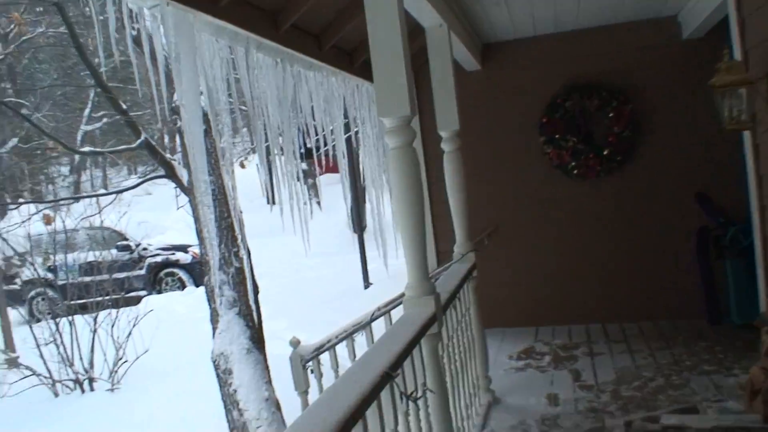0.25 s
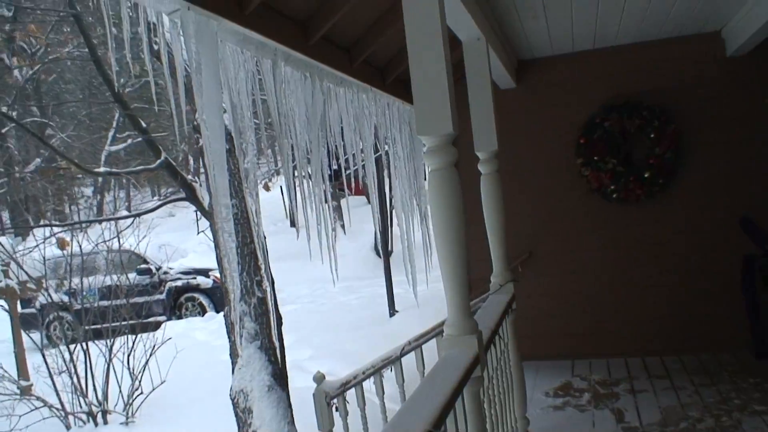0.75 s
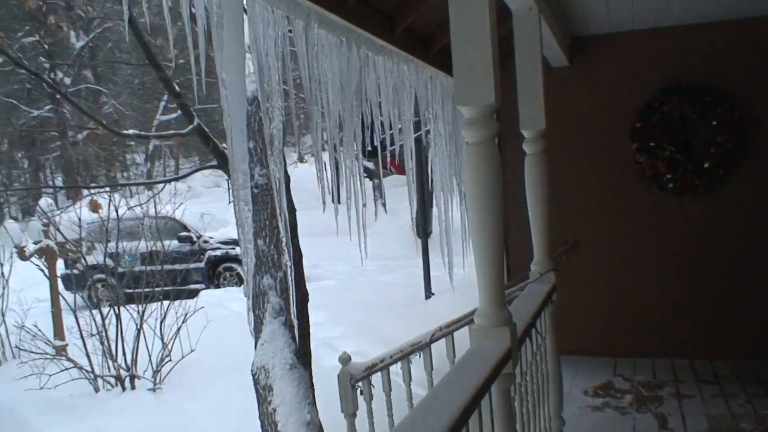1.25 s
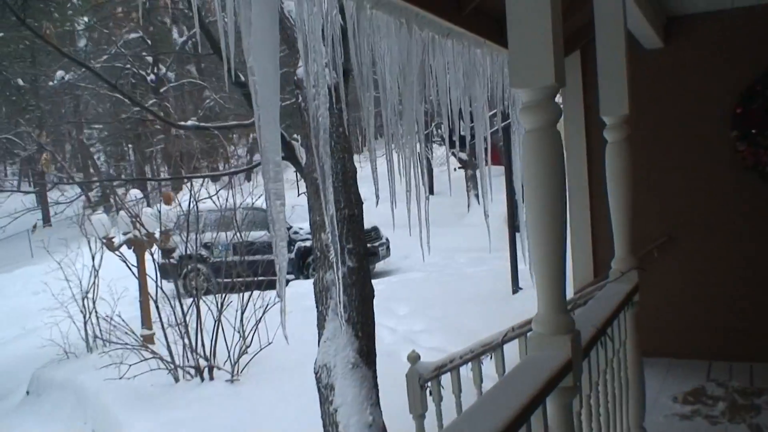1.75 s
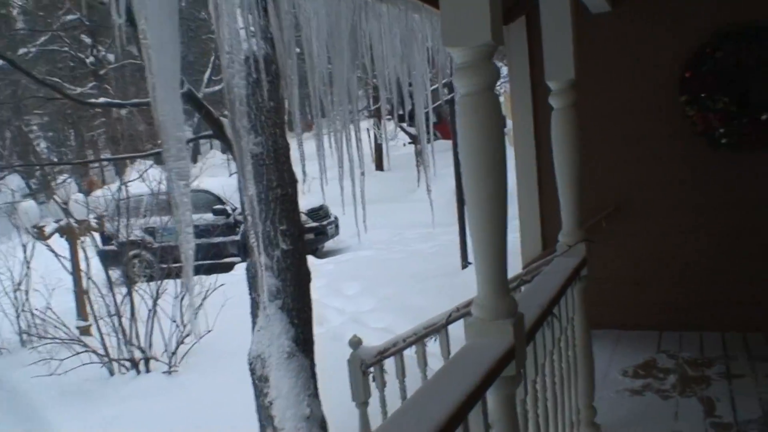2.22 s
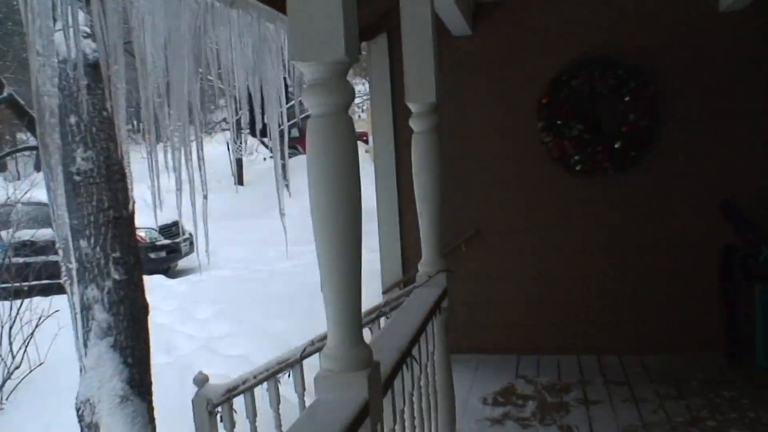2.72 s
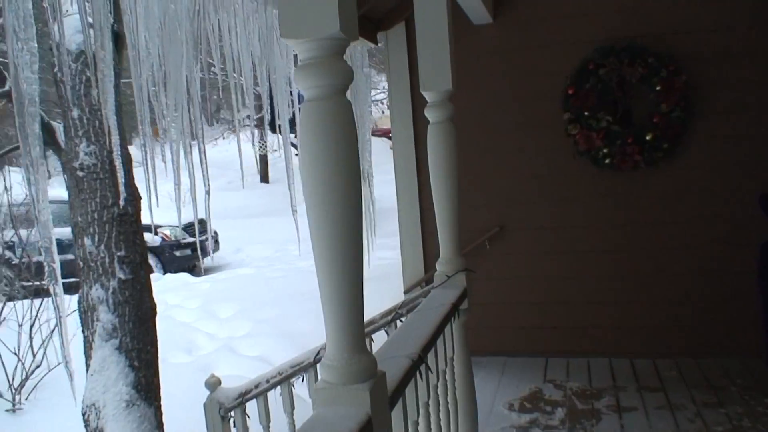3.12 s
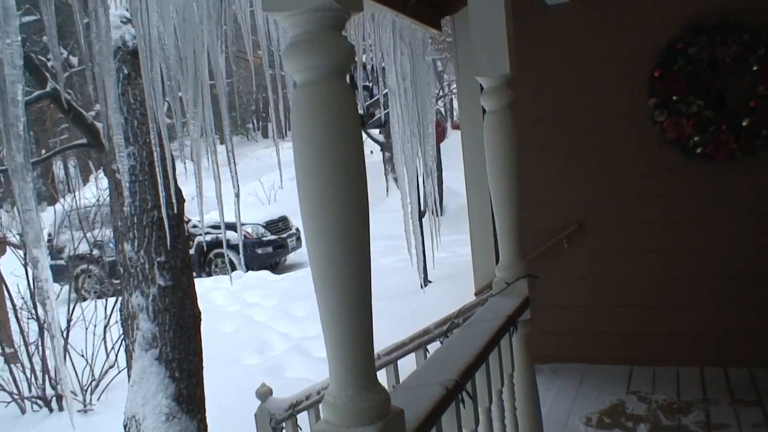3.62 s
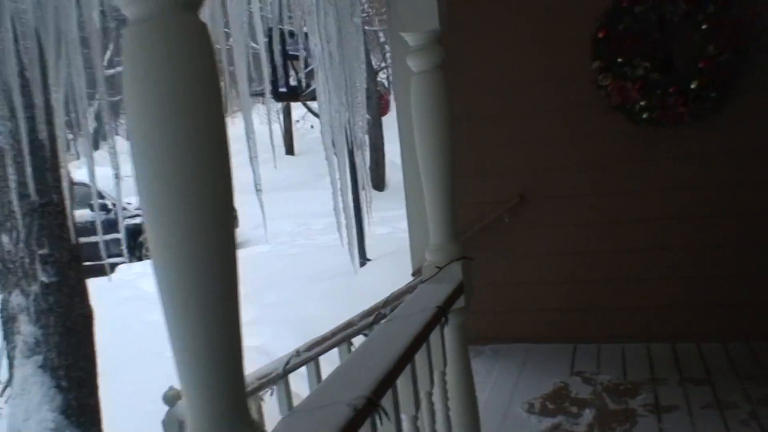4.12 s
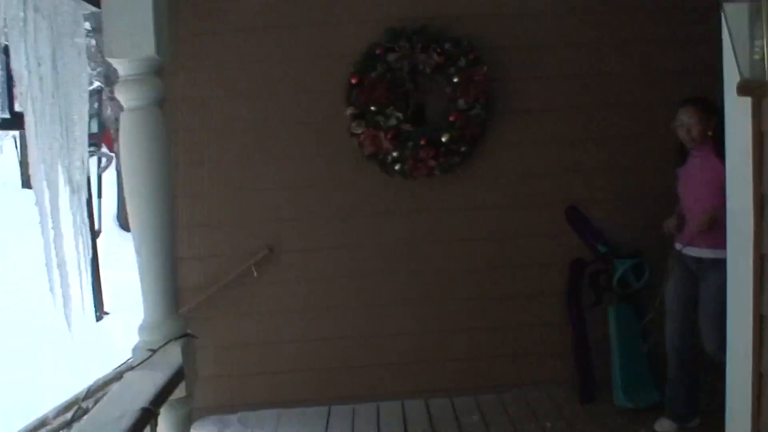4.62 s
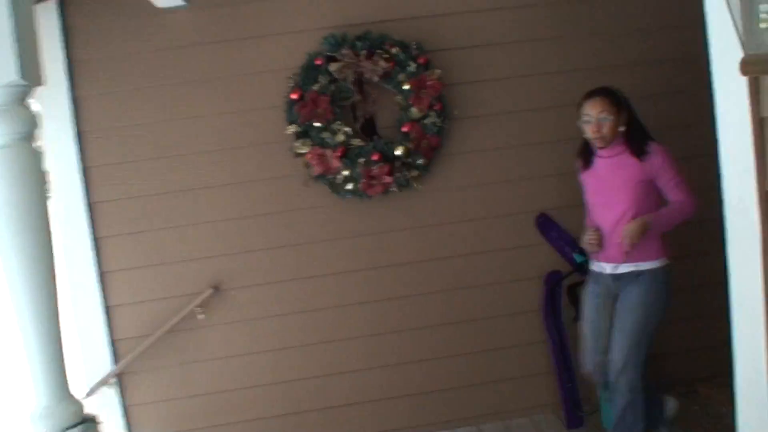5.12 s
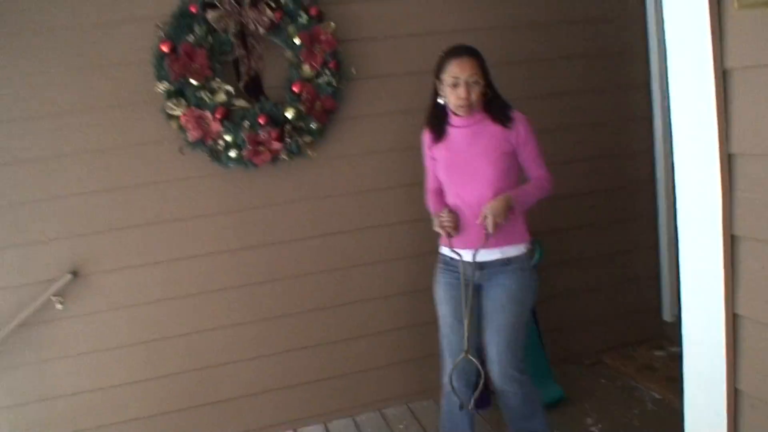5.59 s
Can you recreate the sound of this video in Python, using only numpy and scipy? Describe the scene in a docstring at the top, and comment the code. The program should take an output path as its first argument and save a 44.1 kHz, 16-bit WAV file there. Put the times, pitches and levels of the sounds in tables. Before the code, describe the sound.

Close, woody footfalls on an outdoor porch: heel and sole contacts rattle together, joists thump underneath and snow crackles lightly. The steps continue to the end, the heaviest blow coming late, followed by lighter knocks. Behind them are a weak low hum, a muffled winter outdoor wash and thin hiss. The hand-held camera adds deep, soft bumps, and the covered space answers briefly.

```python
"""Boots on a snowy porch

Boots walk along the boards of a snowy, roofed porch, heard by a hand-held camera. Each contact rings joists
and planks as fading sine waves and adds noise bursts for the knock and the cracking snow; scuffs are grainy noise.
A low engine-like hum, built from sine waves, climbs and drops far off. Shaped noise makes the hand bumps,
the far outdoor wash and the camera's own hiss."""
import sys
import numpy as np
from scipy import signal
from scipy.fft import rfft, irfft, next_fast_len
from scipy.io import wavfile
from scipy.ndimage import uniform_filter1d, map_coordinates

SR = 44100
rng = np.random.default_rng(int(sys.argv[2]) if len(sys.argv) > 2 else 0)


def to_wav(sig):
    """Store sig (one row per channel, or 1-D mono) as 16-bit WAV at the path in sys.argv[1].

    Samples outside -1..1 are clipped; the rate is SR.
    """
    pcm = np.clip(np.atleast_2d(sig), -1, 1) * 32767
    pcm = np.round(pcm).astype(np.int16)
    wavfile.write(sys.argv[1], SR, pcm.T)  # frames by channels


N = 258013

# Noise colors. Each row: frequency in Hz, relative level in dB per Hz.
# Far outdoor wash.
WASH_COLOR = [(35, -40), (60, -0.5), (90, -7), (200, -10.5), (350, -29.5), (650, -17.5), (1200, -23),
              (3000, -29), (6000, -46.5), (9000, -80.5)]
# The camera's own hiss.
HISS_COLOR = [(1500, -26), (4000, -6), (8000, -5.5), (11000, -5), (11500, -2), (16600, -2)]
# Hand thumps on the camera.
THUMP_COLOR = [(12, -15), (26, 3.5), (40, 0), (60, 0.5), (82, -1), (120, -44)]
# Rumbling joists, the beams under the boards.
JOIST_COLOR = [(40, -55), (90, -4.5), (135, -1.5), (200, -5.5), (330, -1), (450, -9), (1200, -76)]
# Knocked or scuffed board surface.
BOARD_COLOR = [(150, -70), (380, 2), (500, 0.5), (900, -1.5), (1500, -7.5), (3500, -27.5)]
# Gritty snow under a sliding sole.
GRIT_COLOR = [(500, -48), (1400, -4), (2500, 5), (4000, -5), (8000, -22), (11000, -38.5), (16500, -25)]
# Cracking snow crust.
CRACK_COLOR = [(600, -12), (1500, 5.5), (2600, 1.5), (3800, -4), (6000, -40)]
# The fine fizz of crushed snow.
FIZZ_COLOR = [(2500, -16), (4200, 2.5), (8000, 2.5), (11000, -7.5), (16500, -8)]

# How alike left and right are for near sounds. Each row: frequency in Hz, likeness (1 is identical).
NEAR_LIKENESS = [(30, 0.29), (130, 1), (400, 0.62), (2400, 0.97), (8000, 0.73), (11000, 0.19), (11500, 1)]
# The same for background and porch echo. Each row: frequency in Hz, likeness (1 is identical).
FAR_LIKENESS = [(30, 0.91), (130, 1), (640, 0.67), (1400, 0.61), (3100, 0.82), (11000, 0.97), (11500, 1)]
# Balance of the microphone pair. Each row: frequency in Hz, left minus right in dB.
LEFT_OVER_RIGHT = [(30, 3.2), (130, 4.4), (220, 3), (330, .2), (700, -.5), (4000, .6), (12000, 0)]
# How long the porch echoes. Each row: frequency in Hz, time to fall by 60 dB in seconds.
PORCH_T60 = [(100, 0.39), (1000, 0.36), (8000, 0.34)]

# Jolts of the hand. Each row: peak time in seconds, peak gain in dB, fall in dB per second.
HAND_JOLTS = [(0.11, -38, 203), (0.49, -40.5, 152), (0.62, -40.5, 155), (0.75, -46, 185), (1.01, -50, 19),
              (1.38, -49, 43), (1.82, -50, 48), (2.22, -37.5, 62), (2.59, -42, 303), (3.13, -48, 300),
              (3.4, -59, 125), (3.55, -48, 128), (3.98, -50, 12), (4.2, -44, 38), (4.675, -34.5, 76),
              (5.18, -43, 180), (5.35, -45.5, 42), (5.62, -49, 80)]
# The hum's moving note. Each row: time in seconds, pitch in Hz, level in dB.
HUM_NOTE = [(0.0, 60, -36), (0.35, 53.14, -54), (0.62, 51.2, -40.5), (0.72, 52.1, -49.5),
            (1.25, 53.3, -53.5), (1.43, 55, -40), (1.55, 54, -53), (1.7, 50.7, -45.5), (1.85, 62.7, -46),
            (2.04, 71.3, -50), (2.16, 70, -56)]
# The hum's lower drone. Each row: time in seconds, pitch in Hz, level in dB, level an octave up in dB.
HUM_DRONE = [(2.0, 35.54, -51, -55), (2.41, 40.2, -60, -62), (2.55, 40.2, -57, -71), (3.13, 39.1, -57, -62),
             (3.3, 37.8, -57, -58.5), (4.15, 35.2, -57, -60)]

# Soles sliding and snow packing. Each row: time in seconds, level of the boards in dB.
SCUFF_LEVELS = [(0.0, -58.5), (0.23, -67.5), (1.5, -60.5), (1.87, -66.5), (2.17, -60.5), (2.34, -48),
                (2.46, -51.5), (2.62, -62), (2.93, -64.5), (3.45, -56), (3.65, -62), (3.93, -67.5),
                (4.1, -56), (4.64, -61), (4.81, -54), (5.13, -63.5), (5.46, -54.5), (5.85, -62.5)]
# Boot contacts. Each row: start in seconds, knock level in dB, joist thud level in dB, plank body level in dB,
# crack level in dB, fizz level in dB, base 60 dB fall time of the wood in seconds, knock pitch in Hz.
BOOT_CONTACTS = [(0.045, -46, -44.5, -46, -61, -63, 0.28, 530),
                 (0.074, -33, -43, -38, -44.5, -57, 0.31, 460),
                 (0.453, -32, -42, -39.5, -42, -47, 0.22, 401),
                 (0.474, -36, -56, -47, -39.5, -39.5, 0.22, 474),
                 (0.501, -39.5, -40.5, -48, -52, -49, 0.16, 474),
                 (0.526, -33, -46, -41.5, -50.5, -54, 0.23, 486),
                 (0.555, -52, -45, -52, -57, -62, 0.17, 471),
                 (0.593, -51, -53, -44.5, -52.5, -57, 0.22, 482),
                 (0.717, -28, -31.5, -39.5, -46.5, -65, 0.18, 423),
                 (1.113, -45, -50.5, -64, -58, -67, 0.27, 1100),
                 (1.3, -42.5, -59, -59, -47.5, -55, 0.2, 668),
                 (1.318, -35, -50, -48, -44.5, -51, 0.26, 509),
                 (1.343, -32, -46, -36.5, -43, -45, 0.29, 799),
                 (1.368, -27.5, -38.5, -33.5, -43, -51, 0.22, 415),
                 (1.395, -30.5, -32, -45, -49, -49, 0.16, 466),
                 (1.421, -29, -42.5, -34, -45, -49, 0.2, 460), (1.434, -28, -46, -42, -47, -44, 0.22, 912),
                 (1.452, -39, -50, -45, -57, -55, 0.22, 412), (1.48, -36, -47, -42.5, -66, -56, 0.19, 447),
                 (1.673, -48, -43.5, -47, -55, -68, 0.28, 417),
                 (1.792, -28.5, -31, -40.5, -50.5, -59, 0.12, 439),
                 (1.828, -63, -39.5, -68, -63, -72, 0.19, 517),
                 (2.12, -40.5, -62, -58, -50, -60, 0.36, 783),
                 (2.209, -30.5, -42.5, -43.5, -39, -47.5, 0.3, 487),
                 (2.256, -51, -46, -62, -53, -49, 0.14, 633),
                 (2.314, -32, -40, -42, -36.5, -46.5, 0.2, 401), (2.339, -44, -38, -47, -57, -50, 0.2, 797),
                 (2.355, -29.5, -40.5, -38.5, -57, -51, 0.24, 401),
                 (2.378, -31, -39, -40, -49, -42, 0.18, 690), (2.399, -43, -38, -42, -52, -58, 0.15, 420),
                 (2.463, -46, -59, -48.5, -42, -42, 0.22, 692),
                 (2.557, -34.5, -38.5, -44.5, -50, -47, 0.2, 735),
                 (2.589, -43.5, -43.5, -55, -48.5, -50.5, 0.23, 767),
                 (3.063, -49, -48, -54.5, -50.5, -53, 0.22, 428),
                 (3.091, -41.5, -42.5, -48, -67, -75, 0.35, 530),
                 (3.138, -30, -35, -33.5, -47, -75, 0.24, 640),
                 (3.262, -45, -50, -58, -51.5, -52.5, 0.47, 720),
                 (3.367, -41, -46.5, -52.5, -69, -58, 0.2, 654),
                 (3.45, -31.5, -39.5, -44, -46, -51, 0.15, 891),
                 (3.487, -34.5, -34, -33.5, -39.5, -54, 0.24, 644),
                 (3.597, -39.5, -51, -55, -48.5, -52, 0.26, 484),
                 (3.886, -39.5, -57, -62, -43.5, -46.5, 0.6, 1040),
                 (3.914, -28.5, -28.5, -35, -38.5, -47.5, 0.27, 500),
                 (3.994, -40, -42.5, -50, -52, -52, 0.16, 487),
                 (4.083, -39.5, -56, -50.5, -52, -51, 0.36, 425),
                 (4.147, -33, -60, -48, -60, -70, 0.22, 447),
                 (4.193, -43.5, -45.5, -53, -50.5, -66, 0.22, 657),
                 (4.304, -41, -41, -43.5, -48.5, -71, 0.3, 579),
                 (4.348, -43, -48, -46, -50.5, -44.5, 0.19, 468),
                 (4.406, -44, -59, -49, -51, -55, 0.2, 455), (4.601, -38.5, -52, -43, -47, -55, 0.4, 498),
                 (4.625, -27.5, -38, -38, -39.5, -70, 0.25, 550),
                 (4.686, -35.5, -39, -43, -42.5, -41.5, 0.14, 681),
                 (4.717, -23, -24.5, -32, -38.5, -44, 0.22, 476),
                 (4.752, -35, -30.5, -46, -49, -55, 0.16, 401), (4.789, -53, -38, -47, -67, -73, 0.17, 415),
                 (4.822, -30, -49, -51, -44.5, -67, 0.2, 471),
                 (4.846, -33, -44.5, -53, -53, -69, 0.26, 1290),
                 (4.918, -38, -49, -55, -60, -62, 0.14, 750),
                 (4.966, -30, -48.5, -46, -49.5, -65, 0.17, 770),
                 (5.071, -55, -50, -53, -53.5, -51.5, 0.29, 428),
                 (5.104, -43.5, -47, -50, -45.5, -50, 0.44, 673),
                 (5.132, -34, -45.5, -51.5, -46.5, -52, 0.27, 649),
                 (5.311, -39, -56, -51, -43, -44.5, 0.27, 825),
                 (5.386, -29.5, -35, -39.5, -41, -65, 0.18, 640),
                 (5.54, -42.5, -56, -55, -62, -62, 0.28, 401),
                 (5.582, -40.5, -45.5, -42, -44, -46, 0.39, 401)]

# Modes, the notes at which wood likes to ring.
# Each row: middle frequency in Hz, relative level in dB, fall time as a share of the contact's wood fall time.
# The heavy joists.
JOIST_NOTES = [(100.5, -12, 1.7), (118.9, -1.5, 0.63), (135.2, 0.5, 1.08), (161.6, -1.5, 0.81),
               (191.4, 1, 0.65), (211.7, 1, 0.55)]
# The planks, same columns: frequency in Hz, relative level in dB, share of the wood fall time.
PLANK_NOTES = [(235.5, 0, 0.65), (275.8, 1, 0.4), (328, 0, 0.55), (371, -10.5, 0.57)]
# The plank surface, same columns: frequency in Hz, relative level in dB, share of the wood fall time.
SURFACE_NOTES = [(429, 0, 0.34), (445.6, 3, 0.3), (499, -4, 0.56), (563, -0.5, 0.19), (633, -2, 0.43),
                 (756.4, -4, 0.83), (876, -0.5, 0.379), (1040, -11, 0.89), (1150, -8, 0.089),
                 (1405, -11, 0.43)]

TOP_HZ = 16550  # highest frequency kept, in Hz
GRIP_DB, JOLT_RISE = -67.5, 240  # steady handling gain in dB; swell of a jolt in dB per second
GRIT_DB, JOISTS_DB = -15.5, -4.5  # average level compared with the scuffed boards
GRIT_GROWS, JOISTS_GROW = 2.2, 1  # how far they swing, in dB per dB of the boards
RING_DB, RAP_DB = -10, -12.5  # the knock's tonal and noisy parts, compared with the knock level
SCATTER_DB = 0.6  # typical left-right scatter of the contacts
FOCUS_DB = 7  # surface modes lose this much per octave away from the knock's pitch
BURST_T60, RISE_S = 0.13, 0.0013  # base fall time (60 dB) and base rise time in seconds, scaled for each part


def amp(db):
    """Turns dB into a gain."""
    return 10 ** (np.asarray(db) / 20)


def unit(x):
    """Scales x to an average strength (rms) of 1."""
    return x / np.sqrt(np.mean(x ** 2) + 1e-20)


def along(points, hz):
    """Reads a (Hz, value) table between its points, on a log frequency axis."""
    f, v = np.transpose(points)
    return np.interp(np.log(hz + 1), np.log(f + 1), v)


def curves(rows):
    """Gives one value per sample for each column after the time."""
    s, *cols = np.transpose(rows)
    return [np.interp(np.arange(N) / SR, s, c) for c in cols]


def wobble(rate):
    """A smooth random curve through `rate` random points a second."""
    points = rng.standard_normal(int(N * rate / SR) + 4)
    return map_coordinates(points, [np.arange(N) * rate / SR])


def filtered(x, response):
    """Multiplies the spectrum of x by a gain that depends on frequency."""
    m = next_fast_len(N + SR // 2)
    return irfft(rfft(x, m) * response(np.fft.rfftfreq(m, 1 / SR)), m)[..., :N]


def paired(two, alike):
    """Mixes two unrelated signals into left and right channels of the given likeness."""
    def middle_and_side(hz):
        turn = np.arccos(np.clip(along(alike, hz), -1, 1)) / 2
        return np.array([np.cos(turn), np.sin(turn)])

    mid, side = filtered(two, middle_and_side)
    return np.array([mid + side, mid - side])


def rush(color, alike=NEAR_LIKENESS):
    """Stereo noise of the given color, with rms 1."""
    noise = filtered(rng.standard_normal((2, N)), lambda hz: amp(along(color, hz)))
    return unit(paired(noise, alike))


def hiss():
    """Electronic hiss: treble noise whose level drifts slightly."""
    return amp(-59 + 0.62 * wobble(2.7)) * rush(HISS_COLOR, FAR_LIKENESS)


def outdoor_wash():
    """Far outdoor wash: mostly low noise whose level drifts slightly."""
    return amp(-57.5 + 0.58 * wobble(2.567)) * rush(WASH_COLOR, FAR_LIKENESS)


def jolts():
    """Handling gain: a steady grip, plus jolts that swell quickly and fade each at its own speed."""
    t = np.arange(N) / SR
    shapes = [db + np.minimum(JOLT_RISE * (t - s), fall * (s - t)) for s, db, fall in HAND_JOLTS]
    return amp(GRIP_DB) + amp(np.max(shapes, axis=0))


def hand_bumps():
    """The hand shakes the camera body: deep noise that follows the jolts."""
    thump = rush(THUMP_COLOR, [(30, 0.98), (90, 0.82), (130, 0.98)])
    power = uniform_filter1d(np.mean(thump ** 2, axis=0), SR // 16)
    thump /= np.sqrt(abs(power) + 0.35)  # evens out the noise's own swells
    return jolts() * thump


def tone(rows):
    """A wavering low tone, with any multiples in the table, faded in and out."""
    hz, *levels = curves(rows)
    t = np.arange(N) / SR
    fade = np.clip(np.minimum(t - rows[0][0] + 0.026, rows[-1][0] - t) / 0.2, 0, 1)
    phase = 2 * np.pi * np.cumsum(hz + 0.75 * wobble(7.1)) / SR
    phase = phase + [[0.3], [-0.3]]  # the left microphone is a little ahead
    waves = sum(amp(db + 0.45 * wobble(16.0)) * np.sin(k * phase) for k, db in enumerate(levels, 1))
    return np.sqrt(2) * fade * waves  # the root of 2 makes the table levels rms levels


def hum():
    """A far engine: its note climbs, then drops to a lower, fainter drone."""
    return tone(HUM_NOTE) + tone(HUM_DRONE)


def porch(x):
    """Wall and ceiling answer briefly, each frequency dying at its own speed."""
    hz, t, z = signal.stft(rng.standard_normal((2, SR // 2)), SR, nperseg=256)
    fade = amp(-60 * t / along(PORCH_T60, hz)[:, None])
    tail = signal.istft(z * fade, SR, nperseg=256)[1]
    tail = tail / np.linalg.norm(tail[0])
    sound = np.pad(x.mean(axis=0), (300, 0))[None]  # the echo starts 300 samples late
    return paired(signal.fftconvolve(sound, tail, axes=1)[:, :N], FAR_LIKENESS)


def grains():
    """Clumps of snow crush at uneven moments: a gain of short bursts with a steady mean power."""
    slips = (rng.random(N) < 150 / SR) * amp(3.2 * rng.exponential(size=N))  # about 150 a second
    fade = amp(-60 * np.arange(SR // 10) / SR / 0.022)  # falls by 60 dB in 22 ms
    clumps = 0.9 + signal.fftconvolve(slips, fade)[:N]
    return clumps / np.sqrt(abs(uniform_filter1d(clumps ** 2, SR // 20)))


def scuff():
    """Sliding soles: the same slips shake grit and boards, while the joists rumble along."""
    boards_db, = curves(SCUFF_LEVELS)
    mean_db = boards_db.mean()
    swing_db = boards_db - mean_db
    slips = grains()
    grit = amp(mean_db + GRIT_DB + GRIT_GROWS * swing_db) * slips * rush(GRIT_COLOR)
    boards = amp(boards_db) * slips * rush(BOARD_COLOR)
    joists_db = mean_db + JOISTS_DB + JOISTS_GROW * swing_db + 3.55 * wobble(25)
    return grit + boards + amp(joists_db) * rush(JOIST_COLOR)


def ringing(modes, t, t60, rise):
    """One blow on wood: fading sine waves with random strengths, tunings, phases and sides."""
    hz, level, share = np.transpose(modes)[:, :, None]
    strength, detune, start, side = rng.standard_normal((4, len(hz), 1))
    fall_db = 60 * t / (share * t60)
    gain = amp(level + 2.5 * strength - fall_db) * (1 - np.exp(-t / rise))
    phase = 2 * np.pi * hz * (1 + 0.032 * detune) * t + 0.73 * start
    pair = np.array([(gain * np.sin(phase + turn * side)).sum(axis=0) for turn in (0.2, -0.2)])
    return pair / np.sqrt(np.mean(pair[:, :SR // 40] ** 2))  # the first 25 ms have rms 1


def steps():
    """Each contact rings joists and planks, knocks their surface and cracks the snow crust."""
    t = np.arange(SR // 4) / SR
    wood, knock, crack, fizz = np.zeros((4, 2, N + SR))
    knocking = 1 - np.exp(-t / (0.46 * RISE_S))
    crushing = 1 - np.exp(-t / (RISE_S + 0.0066))  # the crust gives way a little later
    for s, knock_db, thud_db, body_db, crack_db, fizz_db, t60, knock_hz in BOOT_CONTACTS:
        surface = [(hz, db - FOCUS_DB * abs(np.log2(hz / knock_hz)), share) for hz, db, share in SURFACE_NOTES]
        pan_db = SCATTER_DB * rng.standard_normal()
        sides = amp([[pan_db / 2], [-pan_db / 2]])
        at = slice(round(s * SR), round(s * SR) + len(t))
        # heavy timber starts slowly, the hard heel edge quickly
        wood[:, at] += amp(thud_db) * ringing(JOIST_NOTES, t, t60, RISE_S + 0.003)
        wood[:, at] += amp(body_db) * ringing(PLANK_NOTES, t, t60, RISE_S + 0.0017)
        wood[:, at] += sides * amp(knock_db + RING_DB) * ringing(surface, t, 0.94 * t60, 0.24 * RISE_S)
        # loudness curves for the noise bursts
        knock[:, at] += sides * amp(knock_db + RAP_DB - 60 * t / (1.06 * BURST_T60)) * knocking
        crack[:, at] += sides * amp(crack_db - 60 * t / (1.216 * BURST_T60)) * crushing
        fizz[:, at] += amp(fizz_db - 60 * t / (0.87 * BURST_T60)) * crushing ** 2
    snow = crack[:, :N] * rush(CRACK_COLOR) + fizz[:, :N] * rush(FIZZ_COLOR)
    return wood[:, :N] + knock[:, :N] * rush(BOARD_COLOR) + grains() * snow


def scene():
    """The feet and their porch echo over the hum, bumps, wash and hiss."""
    background = hiss() + outdoor_wash() + hand_bumps()
    feet = scuff() + steps()
    return background + hum() + amp(-8.5) * porch(feet) + feet


def record(dry):
    """The left microphone hears more bass; only frequencies below TOP_HZ are kept."""
    def response(hz):
        return amp(np.outer([0.5, -0.5], along(LEFT_OVER_RIGHT, hz))) * (hz < TOP_HZ)

    return filtered(dry, response)


dry = scene()
out = record(dry)
to_wav(out)
```